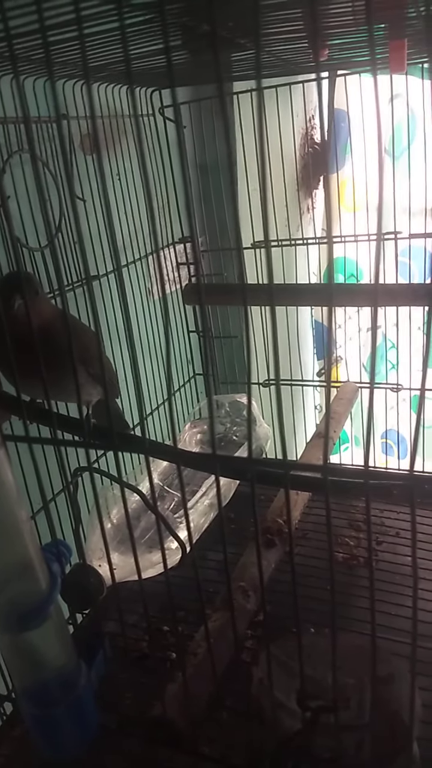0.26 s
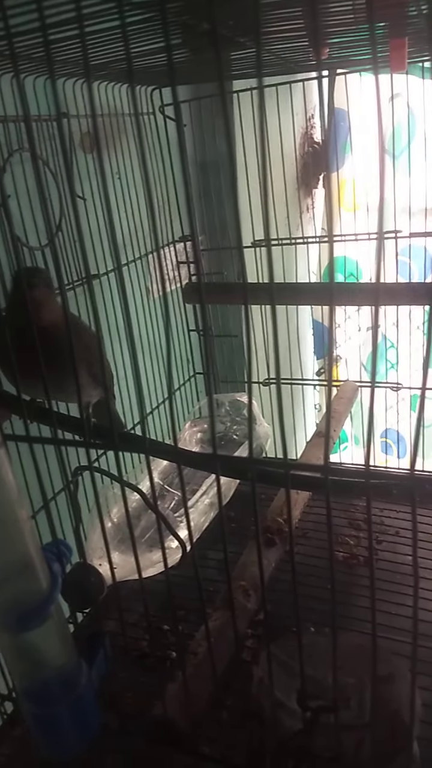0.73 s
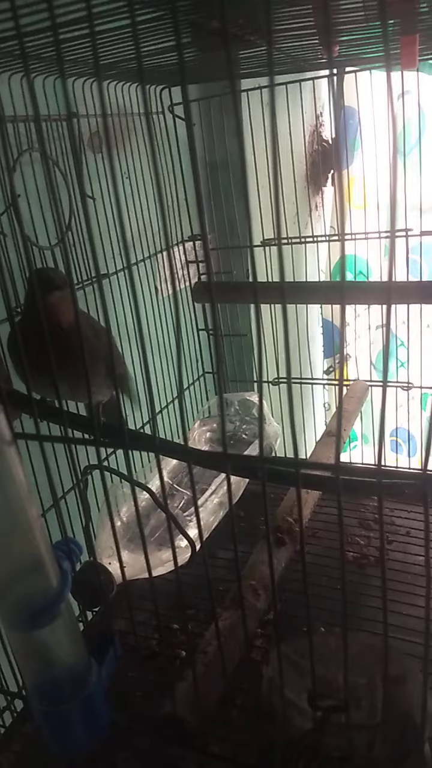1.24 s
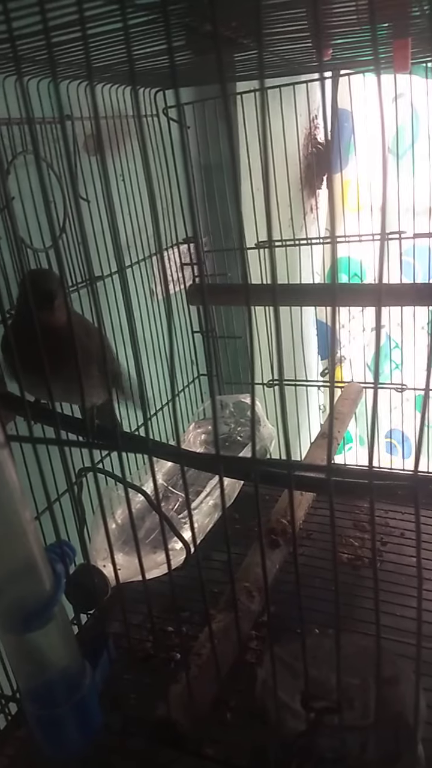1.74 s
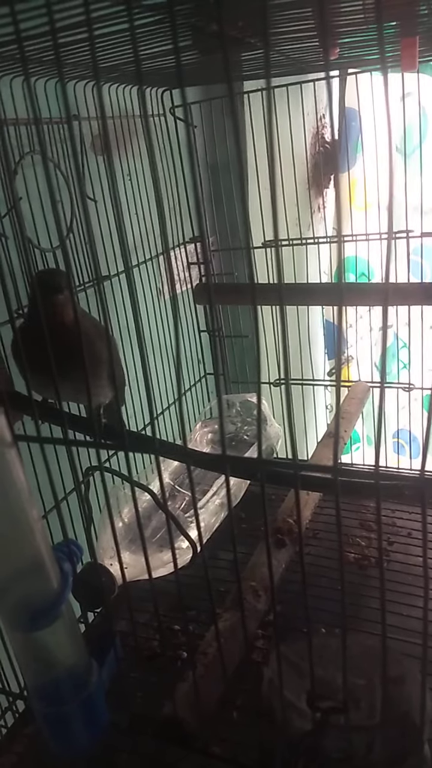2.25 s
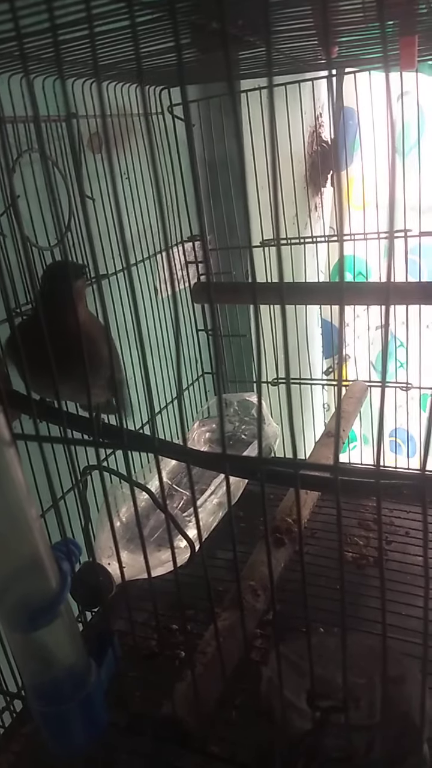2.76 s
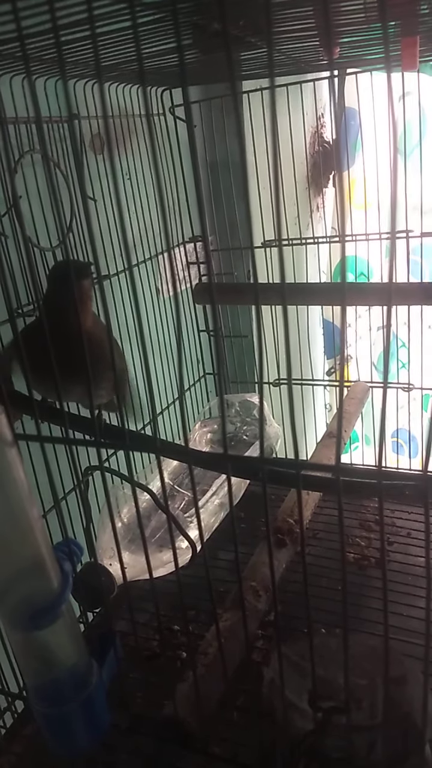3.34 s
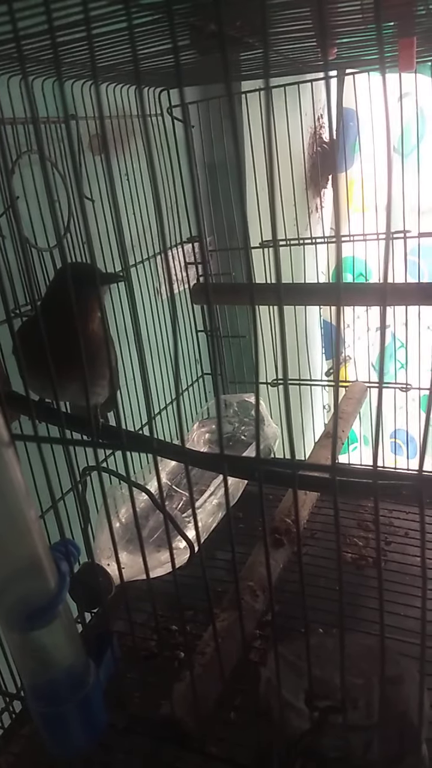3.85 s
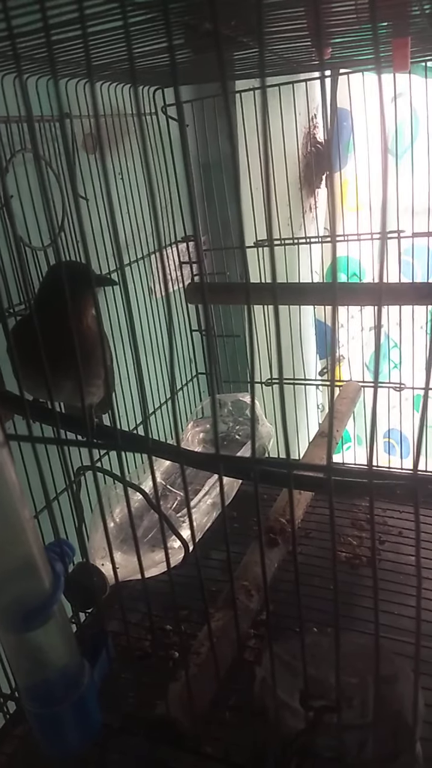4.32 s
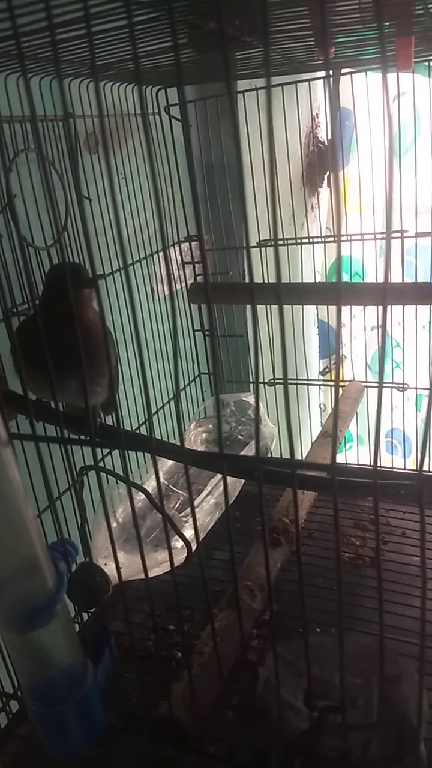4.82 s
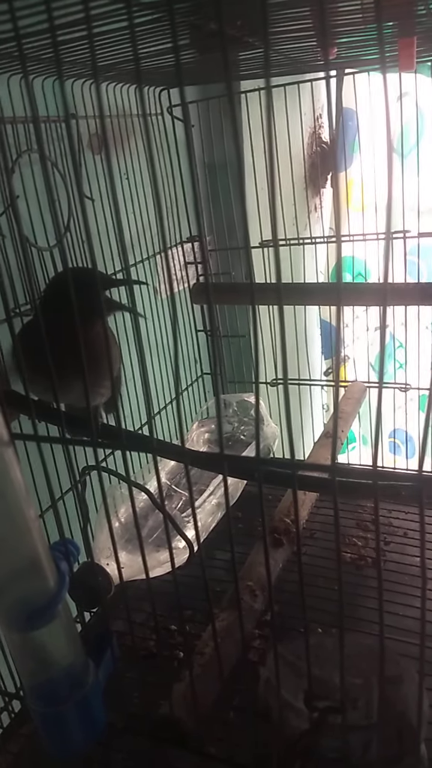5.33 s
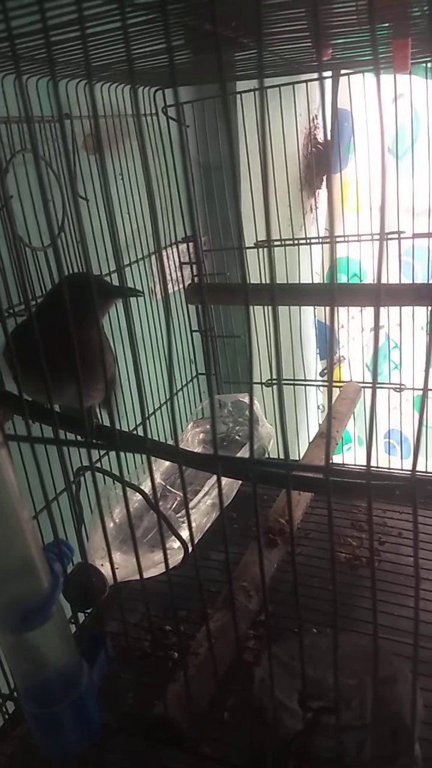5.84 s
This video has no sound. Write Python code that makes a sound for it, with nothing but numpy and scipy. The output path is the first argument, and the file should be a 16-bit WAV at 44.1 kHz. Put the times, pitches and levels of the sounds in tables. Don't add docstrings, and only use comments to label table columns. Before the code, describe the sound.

A caged songbird gives harsh, buzzy, high squawks in quick clusters, then lower warbled whistles, with claws ticking on wire over a steady outdoor hum.

```python
import sys
import numpy as np
from scipy import signal
from scipy.fft import rfft, irfft, next_fast_len
from scipy.io import wavfile
from scipy.ndimage import uniform_filter1d, map_coordinates

SR = 44100
rng = np.random.default_rng(int(sys.argv[2]) if len(sys.argv) > 2 else 0)


def voltage_ratio(decibels):
    exponent = np.asarray(decibels, float) / 20
    return 10 ** exponent


def master(y):
    cut = np.clip(np.atleast_2d(y).T, -1, 1)
    pcm = np.round(cut * 32767)
    wavfile.write(sys.argv[1], SR, pcm.astype(np.int16))


N = 268128
T = np.arange(N) / SR

# (start [s], crest [s], break [s], end [s], effort [dB])
CALL_TIMES = [
    (-.1, -.06, -.006, .024, -8),
    (.101, .152, .188, .23, -11.5),
    (.838, .9, .941, .978, -11),
    (1.016, 1.05, 1.09, 1.124, -11),
    (1.168, 1.19, 1.229, 1.263, -11.5),
    (1.752, 1.855, 1.905, 1.92, -11.5),
    (1.967, 2.058, 2.102, 2.136, -12.5),
    (4.678, 4.72, 4.756, 4.788, -10.5),
    (5.377, 5.421, 5.488, 5.517, -10.5),
    (5.587, 5.623, 5.679, 5.718, -11),
]
# (onset [Hz], crest [Hz], trough before break [Hz], kick after it [Hz], end [Hz])
CALL_PITCHES = [(1400, 2300, 2000, 3104, 3300), (1630, 2217, 1720, 2700, 3240),
                (1350, 2060, 1432, 2190, 1710), (1280, 1560, 1360, 2040, 1900),
                (1294, 1640, 1430, 1800, 1620), (1300, 2300, 1338, 1280, 1180),
                (1110, 2380, 1390, 2257, 1500), (1413, 2180, 1570, 2300, 2080),
                (2002, 2570, 1423, 1866, 1560), (1375, 3540, 1360, 2000, 1360)]
CALL_EFFORT_DB = [-11, -3, 0, -3.5, -5.5, -3, -17]
CALL_HALF_PITCH_DB = [0, 1, -7, -16, -15, -16, -6]
CLIMB_TIME_SHARE, CLIMB_PITCH_SHARE = .3, .7
SAG_TIME_SHARE, SAG_PITCH_SHARE, KICK_S = .6, .64, .015
# (top [s], top pitch [Hz], rise [s], hold [s], fall [s])
PITCH_FLICKS = [(1.031, 2680, 0.013, 0.008, 0.01), (2.03, 4500, 0.005, 0.014, 0.02),
                (0.898, 6100, 0.029, 0.0061, 0.011), (1.047, 8270, 0.016, 0.014, 0.016),
                (1.189, 7750, 0.023, 0.0058, 0.017), (1.815, 5430, 0.008, 0.01, 0.012),
                (1.848, 5230, 0.013, 0.013, 0.013), (2.059, 8120, 0.022, 0.003, 0.013),
                (5.431, 8270, 0.02, 0.0058, 0.021), (5.642, 8130, 0.021, 0.0074, 0.011)]
# (from [s], to [s], share [0-1])
RASP_SPANS = [(0.102, 0.159, 0.24), (0.837, 0.895, 0.1), (1.156, 1.18, 0.7), (1.788, 1.872, 0.29),
              (1.972, 2.036, 0.37), (4.686, 4.73, 0.2), (5.606, 5.616, 0.4)]
# (frequency [Hz], gain [dB])
OPEN_BEAK = [(600, -67), (1500, -18), (2200, -9), (3000, -3.5), (3700, -4.5), (4500, 0.5), (5600, -0.4),
             (6600, -7.5), (7400, -10.5), (8500, -15), (10500, -18), (16000, -3)]
# (frequency [Hz], gain [dB])
SHUT_BEAK = [(600, -38), (1500, -8), (2200, -2), (3000, 7), (4200, -1.5), (5200, -16), (8000, -24),
             (16000, -33)]
# (start [s], length [s], top pitch [Hz], effort [dB], half-pitch overtones [dB])
SOFT_CHIRPS = [
    (.732, .037, 1430, -14.5, 4),
    (5.142, .043, 1550, -13.5, -11),
    (5.268, .062, 1650, -10, -7),
]
# (share of length [0-1], pitch over top [ratio], effort [dB])
CHIRP_ARCH = [(0, .74, -6), (.2, .92, -1), (.48, 1, 0), (.75, .94, -3), (1, .74, -16)]
# (frequency [Hz], t60 [s])
WALL_T60 = [(1000, 0.17), (2300, 0.17), (5000, 0.13), (10000, 0.18)]

# (frequency [Hz], level [dB per Hz])
HUM_SPECTRUM = [(15, -50), (25, -22), (113, -0.5), (291, -2.5), (499, -2.5), (556, -2.5), (1090, -3),
                (1180, -5), (2660, -4.5), (4090, -9.5), (5500, -10.5), (7400, -14.5), (8700, -22.5),
                (14500, -27.5), (15800, -16)]
# (frequency [Hz], correlation [-1 to 1])
HUM_LIKENESS = [(60, 0.96), (180, 0.96), (550, 0.48), (1650, -0.18), (4970, -0.01), (15000, -0.2)]
# (time [s], depth [dB])
HUM_DUCKS = [(-.04, 5), (.15, 2.5), (.89, 6), (1.01, 3), (1.18, 4), (1.81, 7), (2.03, 6), (2.14, 2),
             (2.57, 3), (2.95, 9), (4.69, 5), (5.4, 3.5), (5.62, 4.5)]
HUM_DB, DUCK_IN_S, DUCK_OUT_S = -35.6, .04, .22

# (time [s], peak [dB])
CLAW_TICKS = [(.4504, -24), (.5192, -18), (.6194, -29), (.6847, -19), (.774, -22), (1.279, -23),
              (2.3496, -21.5), (2.7394, -25), (2.7894, -27), (2.8165, -26), (2.88, -27), (3.7922, -27),
              (3.9768, -18), (3.9931, -18), (4.1594, -29.5), (4.2767, -24), (4.3028, -22), (4.3735, -26),
              (4.469, -18.5), (4.4994, -25), (4.8609, -25), (4.9674, -19), (5.216, -23)]
# (time [s], peak [dB])
HUSK_TICKS = [
    (.4674, -34),
    (1.5427, -32),
    (1.5624, -33),
    (1.6551, -31),
    (1.6764, -32),
]
# (frequency [Hz], width [Hz], gain [dB])
TICK_MODES = [(4440, 2700, 18), (8000, 1200, -11.5), (13600, 4000, -17)]
CLAW_BODY_DB, BODY_PER_DB, HUSK_BODY_DB = -10, -.75, 4
TICK_PAN_DB, PAN_PER_BODY = 1.2, -.65

MOTOR_HZ, MOTOR_DB, MOTOR_SAG_HZ_PER_S = 158, -49, 5
MOTOR_FROM_S, MOTOR_TO_S = 1.45, 2.7

# (time [s], pitch [Hz], level [dB], beak opening as fourth overtone [dB])
WHISTLE_BREATHS = [
    [(2.575, 2440, -27, -23), (2.592, 2385, -7.5, -31), (2.65, 2210, -10, -12), (2.672, 2290, -12, -23),
     (2.69, 2260, -27, -20)],
    [(2.925, 2520, -32, -20), (2.945, 2530, -8, -32), (2.975, 2480, -6.5, -33), (3.0, 2380, -9, -16),
     (3.024, 2430, -11, -25), (3.037, 2440, -27, -25)],
    [(3.172, 2320, -34, -20), (3.195, 2220, -13, -21), (3.27, 2060, -16, -18), (3.3, 2110, -10, -13),
     (3.335, 2260, -12, -18), (3.41, 2150, -13, -13), (3.425, 2070, -13, -19)],
    [(3.425, 2070, -13, -19), (3.45, 2120, -11, -10), (3.495, 2090, -11, -8), (3.52, 2240, -11, -10),
     (3.56, 2200, -12, -14), (3.59, 2070, -12, -15), (3.65, 2140, -12, -28), (3.685, 2100, -16, -25),
     (3.702, 2120, -25, -23)],
]
# (multiple of half the pitch, level [dB])
WHISTLE_OVERTONES = [(1, -36), (3, -33), (4, -20.5), (5, -43), (6, -42), (7, -45), (9, -35), (10, -40),
                     (11, -48)]
# (from [s], to [s], first rate [Hz], last rate [Hz], depth [0-1])
WARBLE_SPANS = [
    (3.18, 3.298, 143, 126, .42),
    (3.305, 3.428, 122, 112, .5),
    (3.494, 3.592, 362, 420, .42),
]
BREATH_PAN_DB = [6.5, 2, 4.5, 1.5]
WARBLE_EDGE_S, SWING_HZ, SWING_HZ_PER_RATE = .016, 65, .33

# (frequency [Hz], difference [dB])
PORT_BALANCE = [(100, -0.5), (1500, -0.5), (3000, -0.5), (4300, 1), (5400, -2.5), (6800, -4), (8600, 6),
                (10500, 10), (13000, 10), (15500, -3.5)]
# (frequency [Hz], width [Hz], gain [dB])
PORT_CAVITIES = [(8540, 1610, 3), (5240, 1370, -3)]


def unit(x):
    return x / np.sqrt(np.mean(x ** 2) + 1e-20)


def along(points, hz):
    f, v = np.transpose(points)
    return np.interp(np.log(hz + 1), np.log(f + 1), v)


def curves(rows, t):
    s, *cols = np.transpose(rows)
    return [np.interp(t, s, c) for c in cols]


def glide(s, v, t):
    step = np.diff(v) / np.diff(s)
    same = step[1:] * step[:-1]
    inner = np.where(same > 0, 2 * same / (step[1:] + step[:-1] + 1e-12), 0)
    slope = np.r_[step[0], inner, step[-1]]
    k = np.clip(np.searchsorted(s, t) - 1, 0, len(step) - 1)
    w = np.diff(s)[k]
    u = (t - s[k]) / w
    bend = (slope[k] - step[k]) * (1 - u) - (slope[k + 1] - step[k]) * u
    return v[k] + w * (step[k] * u + u * (1 - u) * bend)


def wobble(rate_hz, size):
    knots = rng.standard_normal(int(size * 4000 / SR) + 9)
    return map_coordinates(knots, [np.arange(size) * min(rate_hz, 4000) / SR])


def plateau(t, start, end, edge_s):
    return np.clip(np.minimum(t - start, end - t) / edge_s, 0, 1)


def filtered(x, response):
    m = next_fast_len(N + SR // 2)
    return irfft(rfft(x, m) * response(np.fft.rfftfreq(m, 1 / SR)), m)[..., :N]


def resonance(f, centre_hz, width_hz, db):
    return voltage_ratio(db) * 1j * f * width_hz / (centre_hz * centre_hz - f * f + 1j * f * width_hz)


def span(rows, joined=(0, 0)):
    at = slice(max(round(rows[0][0] * SR), 0), round(rows[-1][0] * SR))
    t = T[at]
    fade = np.clip(np.minimum(t - rows[0][0] + joined[0], t[-1] - t + joined[1]) / .008, 0, 1)
    return at, t, fade


def left_late(x, samples):
    lag = np.array([[1], [0]]) * samples
    return filtered(x * np.ones((2, 1)), lambda hz: np.exp(-2j * np.pi * hz * lag / SR))


def harsh_notes():
    notes = []
    for (start, crest, snap, end, db), (onset, top, low, kick, last) in zip(CALL_TIMES, CALL_PITCHES):
        climb_s = start + CLIMB_TIME_SHARE * (crest - start)
        sag_s = crest + SAG_TIME_SHARE * (snap - crest)
        kick_s = snap + min(KICK_S, (end - snap) / 2)
        climb_hz = onset * (top / onset) ** CLIMB_PITCH_SHARE
        sag_hz = top * (low / top) ** SAG_PITCH_SHARE
        s = [start, climb_s, crest, sag_s, snap, kick_s, end]
        hz = [onset, climb_hz, top, sag_hz, low, kick, last]
        notes.append(np.transpose([s, hz, db + np.array(CALL_EFFORT_DB), CALL_HALF_PITCH_DB]))
    return notes


def calls(notes, throat, hiss_db):
    out = np.zeros(N)
    for rows in notes:
        at, t, fade = span(rows)
        s, hz, effort_db, half_db = np.transpose(rows)
        log_pitch, half_db = glide(s, np.log(hz), t), np.interp(t, s, half_db)
        for top, top_hz, rise, hold, fall in PITCH_FLICKS:
            u = np.clip(np.minimum(1 + (t - top) / rise, 1 - (t - top - hold) / fall), 0, 1)
            log_pitch = log_pitch + (np.log(top_hz) - log_pitch) * np.sin(np.pi / 2 * u) ** 2
            half_db = half_db - 7 * u
        rasp = 0.115 + sum(share * plateau(t, a, b, 0.01) for a, b, share in RASP_SPANS)
        pitch = np.exp(log_pitch + .04 * rasp * wobble(170, len(t)))
        k = np.arange(1, 21)[:, None] / 2
        overtone_hz = k * pitch
        gains = voltage_ratio(along(throat, overtone_hz) + np.where(k % 1, half_db, 0)) * (overtone_hz < SR / 2.2)
        gains = gains / (1 + (overtone_hz / 9500) ** 6)
        loud = np.sqrt(np.sum(gains ** 2, axis=0) / 2) ** 0.58
        flicker = voltage_ratio(2.5 * np.array([wobble(110, len(t)) for _ in k]))
        phase = 2 * np.pi * np.cumsum(pitch) / SR + 1.6 * rasp * wobble(700, len(t))
        partials = gains * flicker * np.sin(k * phase + rng.uniform(0, 2 * np.pi, k.shape))
        hiss = np.diff(uniform_filter1d(rng.standard_normal(len(t) + 1), size=2))
        voice = np.sum(partials, axis=0) / loud + voltage_ratio(hiss_db) * hiss
        shake = (1 + 1.23 * rasp * wobble(1500, len(t))) / np.sqrt(1 + rasp ** 2)
        out[at] += voltage_ratio(glide(s, effort_db, t) - 1.5) * fade * voice * shake
    return left_late(out, 6.83)


def walls(x):
    out, hop = np.zeros((2, N + SR)), SR // 3
    for a in range(0, N, hop):
        hz, t, z = signal.stft(rng.standard_normal((2, SR // 4)), SR, nperseg=128)
        decay = voltage_ratio(-60 * t / along(WALL_T60, hz)[:, None])
        tail = signal.istft(z * decay, SR, nperseg=128)[1]
        wet = signal.fftconvolve(x[:, a:a + hop], tail / np.linalg.norm(tail[0]), axes=1)
        out[:, a + 60:a + 60 + wet.shape[1]] += wet
    return out[:, :N]


def ducking_db():
    total = np.zeros(N)
    for s, db in HUM_DUCKS:
        late = np.maximum(T - s, 0)
        total -= db * np.minimum(late / DUCK_IN_S, 1) * np.exp(-(late / DUCK_OUT_S) ** 1.5)
    return total


def yard():
    z = signal.stft(rng.standard_normal((2, N)), nperseg=512)[2]
    patches = uniform_filter1d(rng.standard_normal(z.shape[1:]), size=8, axis=0)
    patches = uniform_filter1d(patches, size=8, axis=1)
    pair = signal.istft(z * voltage_ratio(0.98 * unit(patches)), nperseg=512)[1][:, :N]

    def mid_side(hz):
        turn = np.arccos(np.clip(along(HUM_LIKENESS, hz), -1, 1)) / 2
        return voltage_ratio(along(HUM_SPECTRUM, hz)) * [np.cos(turn), np.sin(turn)]

    mid, side = filtered(pair, mid_side)
    return voltage_ratio(HUM_DB + ducking_db() + 4.5) * unit(np.array([mid + side, mid - side]))


def ticks():
    high, low, t = np.zeros((2, N)), np.zeros((2, N)), np.arange(600) / SR
    rows = [(s, db, CLAW_BODY_DB + BODY_PER_DB * (db + 24)) for s, db in CLAW_TICKS]
    rows += [(s, db, HUSK_BODY_DB) for s, db in HUSK_TICKS]
    for s, db, body_db in rows:
        pan_db = TICK_PAN_DB + PAN_PER_BODY * body_db
        spit = rng.standard_normal(len(t)) * (voltage_ratio(-60 * t / 0.0023) + 0.2 * voltage_ratio(-60 * t / 0.06))
        hit = voltage_ratio(db - 0.5 + np.array([[pan_db - 10], [-7.5 - pan_db]]) / 2) * spit
        start = round((s + .001) * SR)
        high[:, start:][:, :len(t)] += hit
        low[:, start:][:, :len(t)] += hit * voltage_ratio(body_db)
    body, edge, top = TICK_MODES
    return (filtered(low, lambda f: resonance(f, *body))
            + filtered(high, lambda f: resonance(f, *edge) - resonance(f, *top)))


def chirp_notes():
    return [[(s + at * length, share * top_hz, db + arch_db, half_db) for at, share, arch_db in CHIRP_ARCH]
            for s, length, top_hz, db, half_db in SOFT_CHIRPS]


def motor():
    turns = np.cumsum(MOTOR_HZ - MOTOR_SAG_HZ_PER_S * (T - 2) + 1.5 * wobble(3, N)) / SR
    near = plateau(T, MOTOR_FROM_S, MOTOR_TO_S, .25)
    return voltage_ratio(MOTOR_DB + ducking_db() / 2 + 1.5 * wobble(4, N)) * near * np.sin(2 * np.pi * turns)


def whistles():
    rate_hz = np.interp(T, np.ravel([w[:2] for w in WARBLE_SPANS]), np.ravel([w[2:4] for w in WARBLE_SPANS]))
    depth = sum(d * plateau(T, a, b, WARBLE_EDGE_S) for a, b, _, _, d in WARBLE_SPANS)
    swing_hz = depth * (SWING_HZ + SWING_HZ_PER_RATE * rate_hz)
    beat = 2 * np.pi * np.cumsum(rate_hz) / SR + .55 * wobble(70, N)
    out, turned = np.zeros((2, N)), 0
    last = len(WHISTLE_BREATHS) - 1
    for i, (rows, pan_db) in enumerate(zip(WHISTLE_BREATHS, BREATH_PAN_DB)):
        at, t, fade = span(rows, (i == last, i == last - 1))
        hz, level_db, fourth_db = curves(rows, t)
        pan_db = pan_db + 1.6 * wobble(25, len(t))
        hz = uniform_filter1d(hz, size=400) + swing_hz[at] * np.cos(beat[at] + 1.47) + 6 * wobble(155.4, len(t))
        hz = hz - 0.25 * depth[at] * rate_hz[at]
        phase = turned + np.pi * np.cumsum(hz) / SR
        turned = phase[-1]
        note = np.sin(2 * phase) + voltage_ratio(fourth_db - 6.5) * np.sin(8 * phase)
        thin_db = -.055 * np.maximum(hz - 2180, 0)
        for k, db in WHISTLE_OVERTONES:
            note = note + voltage_ratio(db + thin_db + 1.9 * wobble(44.3, len(t))) * np.sin(k * phase)
        size = voltage_ratio(level_db + 3.0 + 1.2 * wobble(64, len(t))) * fade * (1 + depth[at] * np.cos(beat[at]))
        sides = np.sqrt(2 / (1 + voltage_ratio(2 * np.array([-pan_db, pan_db]))))
        out[:, at] = size * note * sides
    return left_late(out, 45)


def scene():
    harsh = calls(harsh_notes(), OPEN_BEAK, hiss_db=-26)
    soft = calls(chirp_notes(), SHUT_BEAK, hiss_db=-33)
    sweet = whistles()
    echo = walls(voltage_ratio(-6.5) * harsh + voltage_ratio(-11) * soft + voltage_ratio(-12.5) * sweet)
    return harsh + soft + sweet + echo + ticks() + yard() + motor()


def low_pass(x):
    return signal.sosfilt(signal.butter(12, 15900, fs=SR, output="sos"), x)


def record(dry):
    centre_hz, width_hz, ring_db = np.transpose(PORT_CAVITIES)[:, :, None]

    def ports(hz):
        colour = voltage_ratio(along(PORT_BALANCE, hz) * np.array([[.5], [-.5]]))
        return colour * (1 + resonance(hz, centre_hz, width_hz, ring_db)) * (hz < 15900)

    x = filtered(dry, ports)
    x = x / (1 + np.abs(x / .88) ** 9) ** (1 / 9)
    return low_pass(x)


dry = scene()
out = record(dry)
master(out)
```